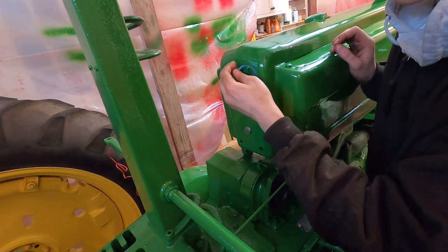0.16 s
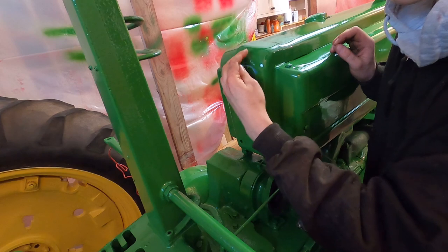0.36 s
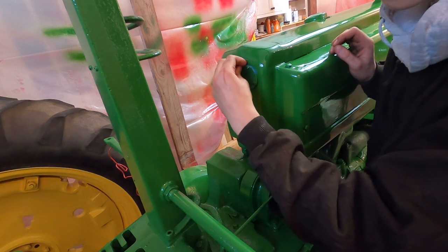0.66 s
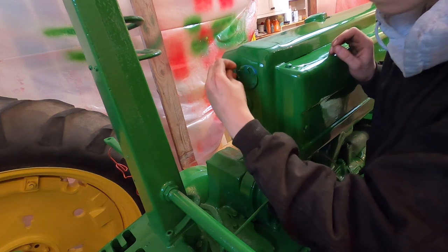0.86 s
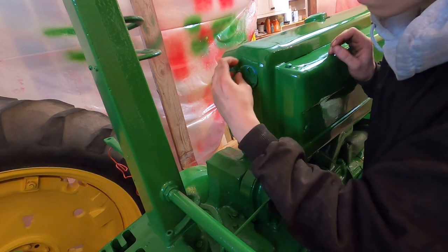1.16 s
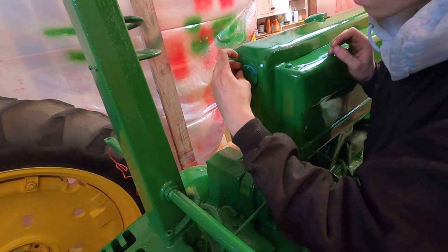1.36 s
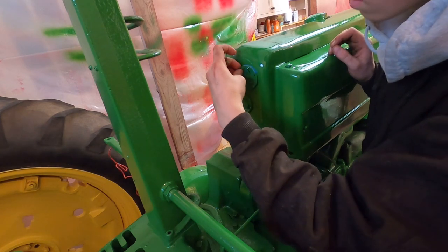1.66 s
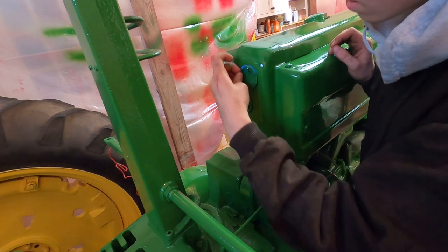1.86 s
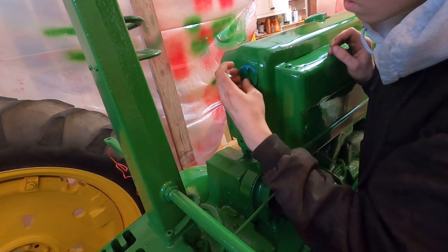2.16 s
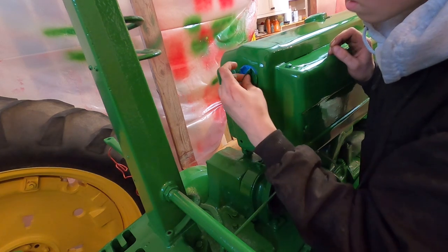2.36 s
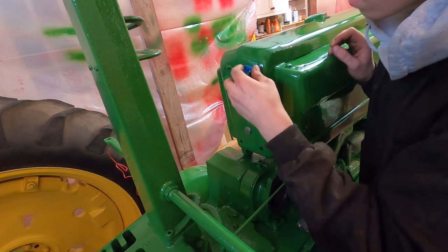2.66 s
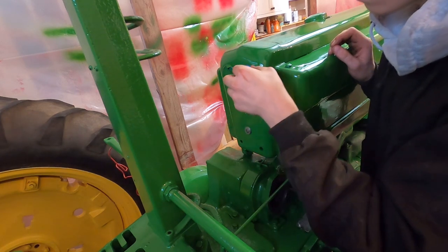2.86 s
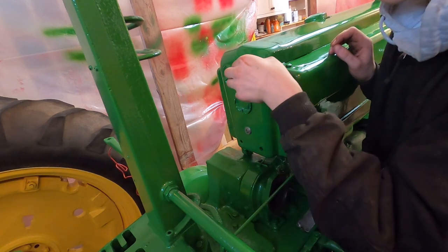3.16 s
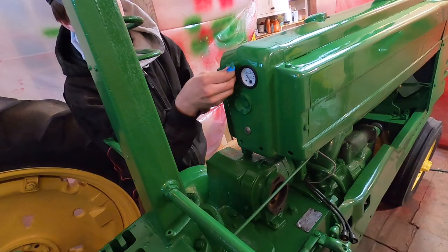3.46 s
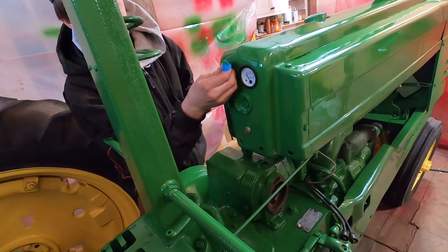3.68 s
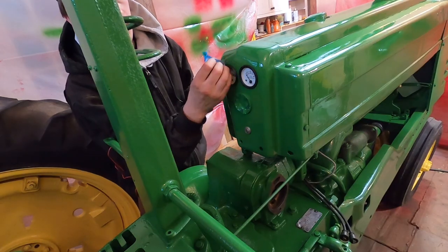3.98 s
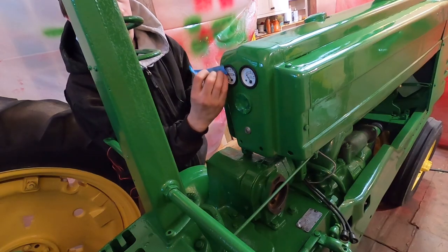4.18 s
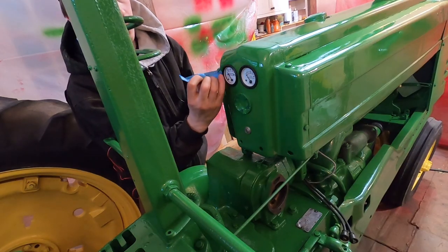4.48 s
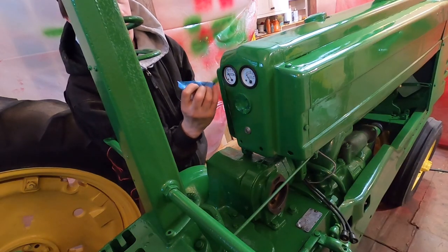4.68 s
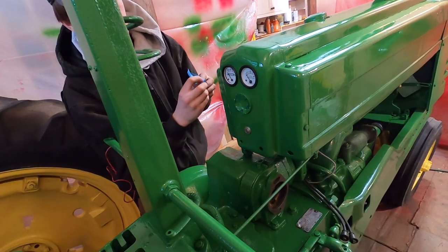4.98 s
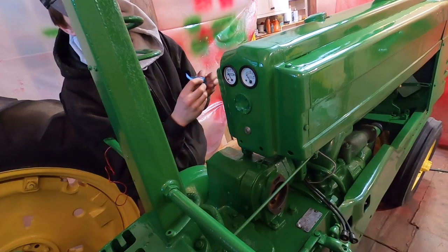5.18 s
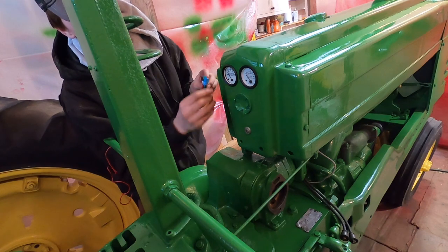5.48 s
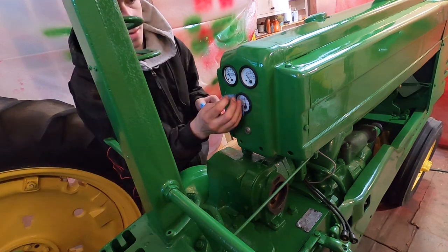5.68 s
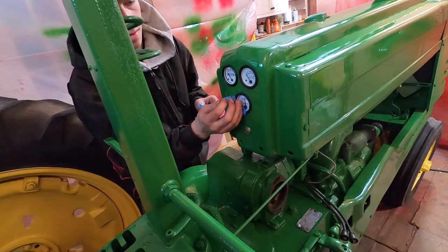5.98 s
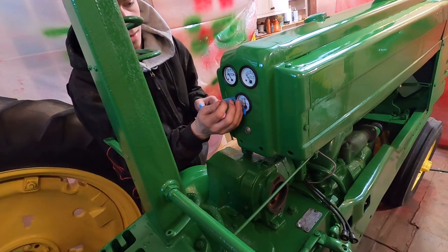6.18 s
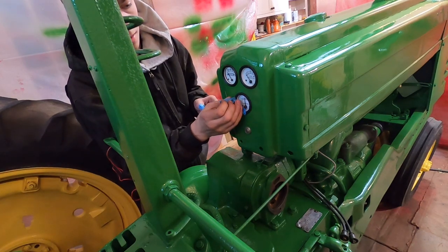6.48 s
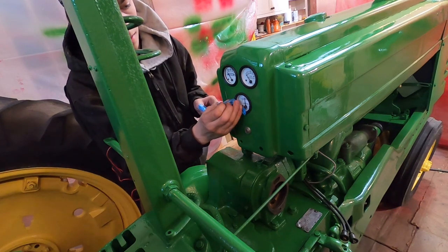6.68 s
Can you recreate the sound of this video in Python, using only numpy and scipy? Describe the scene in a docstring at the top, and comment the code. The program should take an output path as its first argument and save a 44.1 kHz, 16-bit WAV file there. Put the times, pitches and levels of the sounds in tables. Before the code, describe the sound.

Masking tape is picked and peeled off painted metal with crackly rips and sharp snaps, then crumpled, close up in a workshop.

```python
"""A workshop, stereo microphone close to the painted sheet-metal panel of a machine, a low rumble below.
Fingers rub and pick at masking tape; its glue lets go in dense tiny slips and taut strips zip briefly.
Around 2 s hard pulls tear it loose and its creases snap loudly. From 3 s fingertips knock the panel,
and near 4.4 s a knuckle bumps the hollow bodywork during another hard pull. Then the tape is crumpled."""
import sys
import numpy as np
from scipy import signal
from scipy.fft import rfft, irfft
from scipy.io import wavfile
from scipy.ndimage import uniform_filter1d, minimum_filter1d

SR = 44100
rng = np.random.default_rng(int(sys.argv[2]) if len(sys.argv) > 2 else 0)


def store_pcm(level_fs):
    """Save levels as 16-bit WAV."""
    pcm = np.round(np.clip(level_fs, -1, 1) * 32767).astype(np.int16)
    wavfile.write(sys.argv[1], SR, np.atleast_2d(pcm).T)


N = 301644


def from_db(db):
    """Decibels to gain."""
    return 10 ** (np.asarray(db) / 20)


def rms_one(x):
    """Scale to rms 1."""
    return x / np.sqrt(np.mean(x ** 2) + 1e-20)


def in_time(rows):
    """The columns that follow a table's time column, one value per sample."""
    times, *columns = np.transpose(rows)
    return [np.interp(np.arange(N) / SR, times, column) for column in columns]


def shaped(x, spectrum):
    """Filter x by a table of (frequency [Hz], gain [dB])."""
    hz, gain_db = np.transpose(spectrum)
    log_hz = np.log(np.maximum(np.fft.rfftfreq(N, 1 / SR), 1))
    return irfft(rfft(x) * from_db(np.interp(log_hz, np.log(hz), gain_db)), N)


def coloured(x, spectrum):
    """x filtered by the spectrum, at rms 1."""
    return rms_one(shaped(x, spectrum))


def drift(rate_hz):
    """Slow random wander, rms 1."""
    r = np.exp(-2 * np.pi * rate_hz / SR)
    return rms_one(signal.lfilter([1], [1, -2 * r, r * r], rng.standard_normal(N + SR))[SR:])


def ring(x, hz, t60_s):
    """A resonance: a unit click starts a decaying sine of height 1."""
    r, w = from_db(-60 / (t60_s * SR)), 2 * np.pi * hz / SR
    return signal.lfilter([0, np.sin(w)], [1, -2 * r * np.cos(w), r * r], x + 1e-18)


def bandpass(x, low_hz, high_hz, order):
    """Keep one band of x."""
    return signal.sosfilt(signal.butter(order, [low_hz, high_hz], "band", fs=SR, output="sos"), x)


def peak_one(x):
    """Scale to peak height 1."""
    return x / np.max(np.abs(x))


def low_end(hum_hz=126.3, hum_db=-56):
    """Lumpy rumble, the boom of the hollow bodywork and a faint wavering hum in the shop."""
    # Course of the low end: (time [s], rumble [dB], boom [dB])
    levels = [(0.0, -38, -30), (0.17, -42, -45), (1.5, -38.5, -47), (2.08, -42, -40), (2.27, -28, -47.5),
              (2.59, -40.5, -35), (2.8, -42, -49), (2.86, -26, -51.5), (3.26, -29.5, -44), (3.3, -45, -53),
              (3.39, -42, -50), (3.43, -47, -36), (3.87, -38, -45), (4.25, -38.5, -38), (4.44, -22, -31.5),
              (4.52, -27, -41), (4.75, -35.5, -48.5), (5.5, -40.5, -49.5), (6.06, -33, -44),
              (6.13, -33.5, -34.5), (6.5, -31.5, -52.5), (6.84, -47, -41)]
    # Colour of the rumble: (frequency [Hz], gain [dB])
    rumble_spectrum = [(5, -20), (12, -8), (17, 0), (23, -7), (33, -16), (50, -24), (80, -36), (130, -55),
                       (400, -120)]
    # Colour of the bodywork's boom: (frequency [Hz], gain [dB])
    boom_spectrum = [(41, 2), (70, -0.5), (129, -0.5), (177, -9), (215, 0), (330, -12), (450, -14.5),
                     (580, -15.5), (990, -120)]
    rumble_db, boom_db = in_time(levels)
    rumble = coloured(rng.standard_normal(N), rumble_spectrum)
    boom = coloured(rng.standard_normal(N) * from_db(2 * drift(rate_hz=24)), boom_spectrum)
    hum = rms_one(ring(rng.standard_normal(N), hum_hz, t60_s=0.11))
    return from_db(rumble_db) * rumble + from_db(boom_db) * boom + from_db(hum_db) * hum


def handling(touch_bright_db=-10.5, swell_db=20):
    """Gains of crackle, bright edge and rub: the light touch plus every pull, summed as powers."""
    # Fingers sliding lightly over tape and paint: (time [s], crackle [dB], dull rub [dB])
    touch = [(0.0, -60, -37), (0.3, -36.5, -39.5), (0.48, -38, -39.5), (0.54, -48.5, -52.5),
             (0.62, -37, -35), (0.9, -44, -44.5), (1.05, -39.5, -39), (1.22, -45.5, -47), (1.69, -45, -45),
             (1.8, -48, -51), (2.3, -40, -46), (2.7, -56, -43), (2.88, -63, -56.5), (3.27, -40.5, -44.5),
             (3.39, -57, -56.5), (3.44, -43, -46), (3.71, -38, -51), (4.21, -42.5, -37.5),
             (4.72, -49.5, -45), (4.88, -43.5, -44.5), (5.36, -39.5, -43), (5.71, -45, -49.5),
             (6.19, -48, -54.5), (6.71, -41, -45.5), (6.84, -52.5, -55)]
    # Pulls that tear the tape loose, climbing swell_db in the rise and sinking as far in the fall:
    # (peak time [s], crackle [dB], rise [s], fall [s], edge relative to crackle [dB], rub [dB])
    pulls = [(0.041, -34, 0.18, 0.12, -13, -58), (0.17, -32.5, 0.11, 0.038, -15, -38),
             (0.878, -27, 0.14, 0.11, -8.5, -70), (0.926, -28.5, 0.059, 0.029, -4.5, -70),
             (1.94, -23, 0.023, 0.078, -13, -42), (2.057, -14.5, 0.02, 0.033, -14, -44),
             (2.113, -24.5, 0.068, 0.097, -9, -30.5), (2.377, -28, 0.084, 0.088, -17, -40.5),
             (2.499, -19.5, 0.095, 0.13, -10, -30), (2.6, -21.5, 0.021, 0.06, -15, -24),
             (2.78, -33.5, 0.365, 0.14, -13, -37), (3.035, -31, 0.18, 0.14, -14.5, -35.5),
             (3.5, -31, 0.057, 0.13, -19, -38), (3.78, -32.5, 0.033, 0.3, -16, -59),
             (3.93, -24.5, 0.039, 0.098, -7.5, -33), (4.084, -23, 0.03, 0.079, -21, -19.5),
             (4.44, -17.5, 0.18, 0.1825, -14, -28.5), (4.528, -18.5, 0.15, 0.018, -8.5, -30),
             (4.734, -35.5, 0.007, 0.1, -4, -38), (4.775, -31, 0.011, 0.054, -13, -57),
             (4.84, -29, 0.028, 0.045, -12, -46), (4.92, -36, 0.065, 0.19, -12.5, -39.5),
             (5.045, -29, 0.013, 0.073, -11.5, -37), (5.113, -27, 0.0097, 0.033, -7, -31.5),
             (5.232, -25, 0.11, 0.036, -12, -34.5), (5.468, -27, 0.069, 0.062, -13, -35.5),
             (5.645, -25, 0.019, 0.012, -18, -38), (5.941, -33, 0.09, 0.067, -10.5, -43),
             (6.12, -35.5, 0.047, 0.13, -5, -35.5), (6.241, -38.5, 0.066, 0.12, -11, -47.5),
             (6.393, -22, 0.015, 0.014, -8.5, -35), (6.55, -30.5, 0.17, 0.11, -11, -36.5),
             (6.65, -36, 0.036, .04, -10, -63)]
    t = np.arange(N) / SR
    touch_db, touch_rub_db = in_time(touch)
    power = from_db([touch_db, touch_db + touch_bright_db, touch_rub_db]) ** 2
    for s, crackle_db, rise_s, fall_s, bright_db, rub_db in pulls:
        near = slice(max(round((s - 2 * rise_s) * SR), 0), round((s + 2 * fall_s) * SR))
        envelope_db = -swell_db * np.maximum((s - t[near]) / rise_s, (t[near] - s) / fall_s)
        peaks_db = np.array([[crackle_db], [crackle_db + bright_db], [rub_db]])
        power[:, near] += from_db(envelope_db + peaks_db) ** 2
    return np.sqrt(power)


def slips(per_s, spread_db, clump_db, burst_s):
    """Glue letting go: an envelope of clumped short bursts of uneven size; rms 1."""
    onsets = rng.random(N) < per_s * from_db(clump_db * drift(rate_hz=40)) / SR
    sizes = onsets * from_db(spread_db * np.minimum(rng.exponential(1, N), 4))
    return rms_one(signal.lfilter([1], [1, -np.exp(-1 / (burst_s * SR))], sizes))


def torn_noise(grain, edges_hz=(900, 3200, 4300, 5600, 8500, 17000)):
    """Grainy tearing: some slips shake the whole strip, others only one band of it."""
    out = np.zeros(N)
    whole = slips(per_s=350, spread_db=5.5, clump_db=3.0, burst_s=0.00089)
    for low, high in zip(edges_hz, edges_hz[1:]):
        own = slips(per_s=230, spread_db=2.0, clump_db=2.5, burst_s=0.0049)
        envelope = grain * (0.92 * whole + 1.15 * own) + 1 - grain
        out += bandpass(envelope * rng.standard_normal(N), low, high, order=2)
    return out


def paper_resonances(x, bands=14, depth_db=2, rate_hz=13.1):
    """Narrow bands of the paper swell and fade, each on its own."""
    edges_hz, out = np.geomspace(500, 7500, bands + 1), x.copy()
    for low, high in zip(edges_hz, edges_hz[1:]):
        gain = from_db(depth_db * np.clip(drift(rate_hz), -2, 2))
        out += (gain - 1) * bandpass(x, low, high, order=1)
    return out


def peeling():
    """One tearing noise sounds in the tape's crackle band and its bright edge; the rub is smoother."""
    # Colour of the tape's crackle: (frequency [Hz], gain [dB])
    crackle_spectrum = [(1000, -32), (1700, -6), (2450, -2), (2900, 1.5), (4200, 5.5), (5000, 5.5),
                        (6500, -0.5), (8000, -18), (11000, -51)]
    # Colour of its bright edge: (frequency [Hz], gain [dB])
    edge_spectrum = [(5500, -31), (7500, 5), (9500, 3.5), (12500, 5.5), (15500, -0.5)]
    # Colour of the dull rub on the panel: (frequency [Hz], gain [dB])
    rub_spectrum = [(180, -9), (300, 1), (1310, 2.5), (2600, -0.5), (3380, 0.5), (5720, -120)]
    crackle_gain, edge_gain, rub_gain = handling()
    # A light touch hisses, a hard pull tears in grains.
    grain = np.clip((20 * np.log10(crackle_gain) + 52) / 32, 0.1, 0.8)
    tearing = torn_noise(grain)
    scuff = slips(per_s=110, spread_db=1.0, clump_db=1.0, burst_s=0.023) + 0.42
    zipping = zips()
    crackle = crackle_gain * coloured(tearing, crackle_spectrum)
    edge = edge_gain * coloured(tearing, edge_spectrum)
    rub = rub_gain * coloured(scuff * rng.standard_normal(N), rub_spectrum)
    return edge + zipping + paper_resonances(crackle + rub)


def zips(half_width_hz=220):
    """A taut strip rings in a narrow, sinking band while it slips."""
    # Taut strips: (start [s], length [s], first pitch [Hz], last pitch [Hz], level [dB])
    strips = [(0.097, 0.072, 2650, 2580, -33), (0.835, 0.11, 3420, 2800, -28.5),
              (1.482, 0.014, 3600, 3500, -34.5)]
    slipping = slips(per_s=320, spread_db=4.0, clump_db=0.0, burst_s=0.0031) * rng.standard_normal(N)
    lowpass = signal.butter(2, half_width_hz, fs=SR, output="sos")
    out = np.zeros(N)
    for s, length_s, from_hz, to_hz, level_db in strips:
        at, size = round(s * SR), round(length_s * SR)
        progress = np.linspace(0, 1, size)
        phase = 2 * np.pi * np.cumsum(from_hz + (to_hz - from_hz) * progress) / SR
        flutter = rms_one(signal.sosfilt(lowpass, slipping[at:at + size]))
        fade = np.clip(4 * progress, 0, 1) * np.clip(20 * (1 - progress), 0, 1)
        out[at:at + size] += from_db(level_db) * fade * flutter * np.cos(phase)
    return out


def crease_snaps(size=4000, rustle_db=-24.5, rustle_follows=0.45):
    """Each crease breaks in about a millisecond, rings a few cycles and leaves a short broad rustle."""
    # Snapping creases: (time [s], crack peak [dB], ring [Hz], body [dB re crack], edge [dB re crack])
    creases = [(0.1771, -16, 4820, -17, -16), (0.3278, -9, 3720, -38, -19), (0.704, -12, 3220, -21, -15),
               (0.716, -15, 4850, -30, -17), (0.871, -6, 3900, -41, -19), (0.9311, -12.5, 3870, -14, -3),
               (1.6523, -14.5, 3900, -41, -9.5), (1.8815, -18, 5600, -35.5, -7),
               (1.893, -11, 5750, -41.5, -28), (1.917, 1, 4000, -26, -12), (1.9274, -2, 4870, -38, -6),
               (1.9345, -2, 4200, -22, -13), (1.944, -2, 4220, -20, -15), (1.9735, -5, 3820, -35, -26),
               (2.0383, 0.5, 5800, -34.5, -2.5), (2.0458, -10, 3900, -15, -2), (2.0525, 1, 4060, -12, -7),
               (2.0708, -8.5, 5000, -14, -3), (2.138, -7, 3900, -17, -3), (2.254, -12.5, 6150, -30, -12),
               (2.2842, -2.5, 3930, -10.5, -13), (2.37, -17, 3770, -33.5, -25), (2.386, -5, 3980, -17, -18),
               (2.4583, -13, 3970, -21, 1), (2.485, 7, 3800, -15, -6.5), (2.5041, -4, 4840, -16, -17),
               (2.517, 1, 3700, -20, -20), (2.5533, 3, 4600, -15.5, -12), (2.587, -3, 5040, -8, -2),
               (2.5968, 6.5, 3840, -11.5, -6), (2.825, -20.5, 5230, -28, -6.5),
               (3.054, -13, 3930, -29, -26), (3.42, -24.5, 4500, -8, -7), (3.494, -4.5, 4660, -13.5, -12.5),
               (3.5506, -10, 2760, -34, -9), (3.5688, -7, 4600, -29, -17), (3.769, -10.5, 4900, -38, -4.5),
               (3.7783, -6.5, 4840, -41, -29), (3.9172, 7, 3740, -12.5, -12), (3.927, 10.5, 4950, -25, -5),
               (3.946, -10, 4900, -37, 1), (4.1702, -5.5, 5440, -29, -46.5), (4.229, -15.5, 3930, -27, -11),
               (4.3296, -19.5, 3200, -1, 2), (4.379, -8, 5570, -6, -9), (4.428, -18, 4660, -25, -20),
               (4.449, -10, 4100, -13, 3), (4.455, -5, 3670, -19, -10), (4.471, -4, 4760, -22, -2),
               (4.5162, -16, 4370, -7, -6), (4.5215, -14.5, 3000, 7, -10), (4.5382, -4.5, 4870, -29, -15),
               (4.5955, -4.5, 4060, -17.5, -5.5), (4.696, -23, 4430, -27, -15), (4.731, -27.5, 4130, 1, 5),
               (4.834, -11.5, 4900, -11, -9), (4.916, -14.5, 4800, -22, -14), (5.035, -27, 4460, 4, -1),
               (5.107, -10.5, 4200, -5.5, -7), (5.1941, -19, 2930, -2, 0.5), (5.3946, -15, 4500, -14, -20),
               (5.426, -2.5, 5070, -15, -25), (5.468, -3, 5800, -13, -13.5), (5.6328, -4.5, 4230, -17, -36),
               (5.805, -15, 5140, -50, -15), (6.0533, -1.5, 5030, -19, -12), (6.076, -7, 3800, -34, -14),
               (6.11, 4, 4230, -8.5, -1), (6.501, -20, 3530, -6, -8), (6.539, -4, 4000, -14, -12),
               (6.565, -12, 3570, 0.5, -24), (6.6326, -14.5, 4730, -30, -17), (6.709, -24.5, 4120, -9, 1)]
    out, t = np.zeros(N + size), np.arange(size) / SR
    for s, peak_db, ring_hz, body_db, edge_db in creases:
        noise = rng.standard_normal(size)
        tick = noise * t * np.exp(-t / 0.00023)
        rustle_gain = from_db(rustle_db - (1 - rustle_follows) * peak_db)   # larger share in soft snaps
        burst = peak_one(tick) + rustle_gain * noise[::-1] * np.exp(-t / 0.0066)
        second_hz = ring_hz * 1.285 ** np.sign(4500 - ring_hz)   # a second ring across the band
        tone = ring(tick, ring_hz, t60_s=0.0089) + 0.23 * ring(tick, second_hz, t60_s=0.0052)
        ringing = peak_one(bandpass(tone, 1870, 9900, order=3))
        crack = peak_one(ringing + 1.6 * peak_one(bandpass(burst, 3070, 5900, order=3)))
        body = from_db(body_db) * peak_one(bandpass(burst, 1136, 2270, order=3))
        edge = from_db(edge_db) * peak_one(bandpass(burst, 5700, 14500, order=3))
        at = round(s * SR)
        out[at:at + size] += from_db(peak_db) * (crack + body + edge)
    return out[:N]


def finger_knocks(size=3000, press_s=0.0095):
    """A fingertip lands and drags for a moment; a hard touch favours the high panel modes."""
    # Fingers on the panel: (time [s], push at 300 Hz [dB], hardness [dB per octave])
    knocks = [(3.025, -90, 32), (3.422, -49.5, -5.5), (3.484, -57, -2), (3.974, -55.5, 8.5), (4.06, -47, 1),
              (4.132, -56, 2), (4.384, -59, 14.5), (6.112, -65, 15)]
    # Modes of the sheet metal: (frequency [Hz], level [dB], 60 dB decay time [s])
    panel_modes = [(163, -23, 0.19), (214.5, -2, 0.19), (308, -8, 0.11), (403, -3, 0.093),
                   (479, -8.5, 0.12), (590, -2.5, 0.085), (900, -4, 0.019)]
    out, presses = np.zeros(N), np.arange(size) / SR / press_s
    pressure = 2 * presses * np.exp(-presses)
    for hz, mode_db, t60_s in panel_modes:
        push = np.zeros(N + size)
        for s, push_db, hardness in knocks:
            at = round(s * SR)
            drag = rng.standard_normal(size) * pressure
            push[at:at + size] += drag * from_db(push_db + mode_db + hardness * np.log2(hz / 300))
        out += ring(push[:N], hz, t60_s)
    return out


def knuckle_thuds(size=9000, press_s=0.00087):
    """One short blunt push sets the hollow bodywork ringing low."""
    # Knuckle bumps: (time [s], peak [dB], ring [Hz])
    bumps = [(4.325, -18, 108), (4.397, -19, 288), (4.409, -16, 136), (4.428, -19.5, 120)]
    out, t = np.zeros(N), np.arange(size) / SR
    push = -t * np.exp(-t / press_s)
    for s, peak_db, ring_hz in bumps:
        at = round(s * SR)
        out[at:at + size] += from_db(peak_db) * peak_one(ring(push, ring_hz, t60_s=0.1))
    return out


def smear(x, t60_s):
    """Spread x over a decaying, dulled noise tail that starts 3 ms late."""
    t = np.arange(SR // 2) / SR
    decay = from_db(-60 * t / t60_s) * (t > 0.003)
    tail = signal.lfilter([1], [1, -0.3], rng.standard_normal(len(t)) * decay)
    return signal.fftconvolve(x, tail / np.sqrt(np.sum(tail ** 2)))[:N]


def scene(room_db=-14.5):
    """Close tape and panel in the workshop: nearly mono, with a faint, slightly smeared difference between the
    two channels."""
    # Colour of the difference between the channels: (frequency [Hz], gain [dB])
    side_spectrum = [(60, -60), (380, -27.5), (1300, -40.5), (4400, -55.5), (8120, -28), (15000, -24)]
    close = peeling() + crease_snaps() + finger_knocks() + knuckle_thuds()
    room = from_db(room_db) * smear(close, t60_s=0.14)
    mid = close + room + low_end()
    side = shaped(smear(mid, t60_s=0.02), side_spectrum)   # short smear for the channel difference
    return np.array([mid + side, mid - side])


def record(dry, ceiling=0.93, window=41, cutoff_hz=15900):
    """A fast limiter holds peaks just under full scale, then the top treble is cut."""
    allowed_gain = np.minimum(ceiling / (np.abs(dry).max(axis=0) + 1e-9), 1)
    smooth_gain = uniform_filter1d(minimum_filter1d(allowed_gain, size=window), size=window)
    lowpass = signal.ellip(10, 0.3, 80, cutoff_hz, fs=SR, output="sos")
    return signal.sosfilt(lowpass, dry * smooth_gain)


dry = scene()
out = record(dry)
store_pcm(out)
```